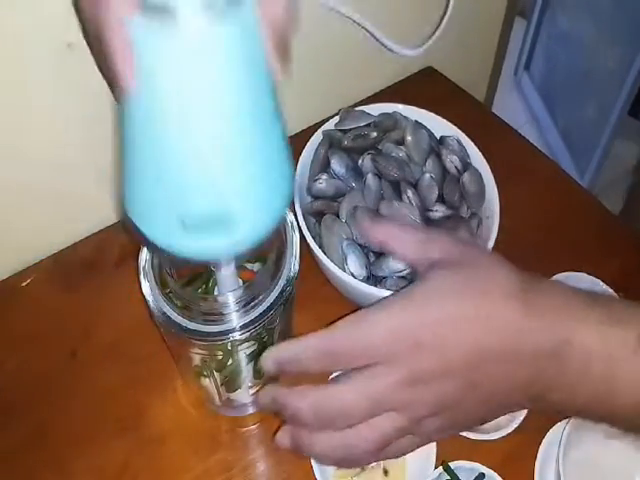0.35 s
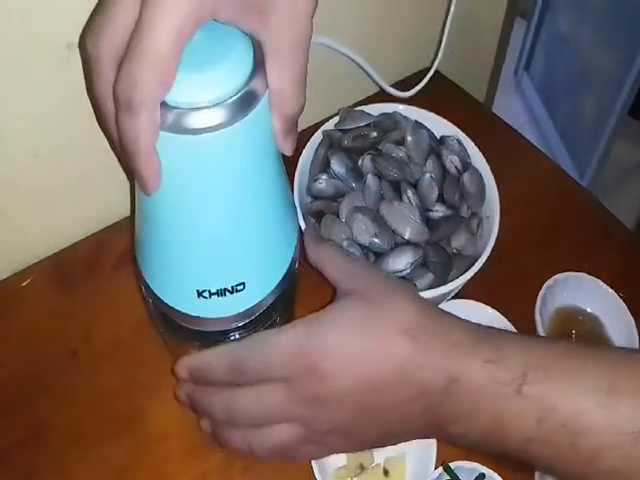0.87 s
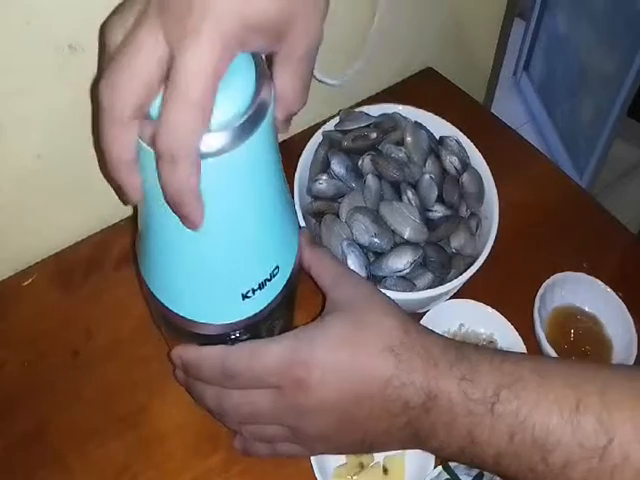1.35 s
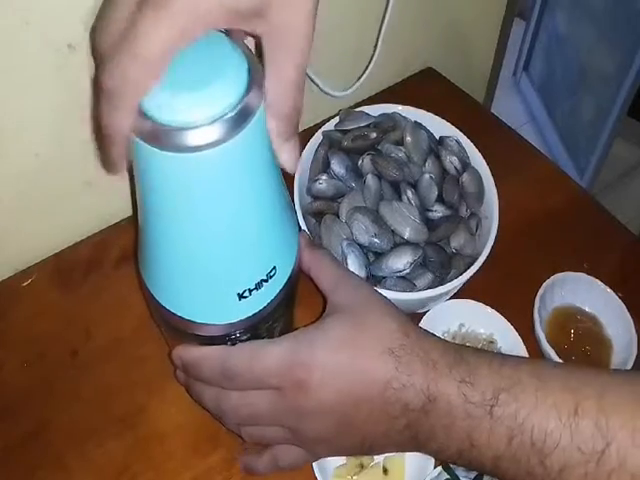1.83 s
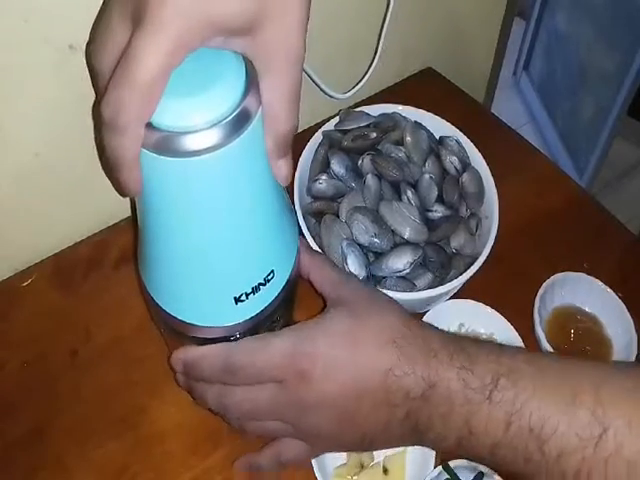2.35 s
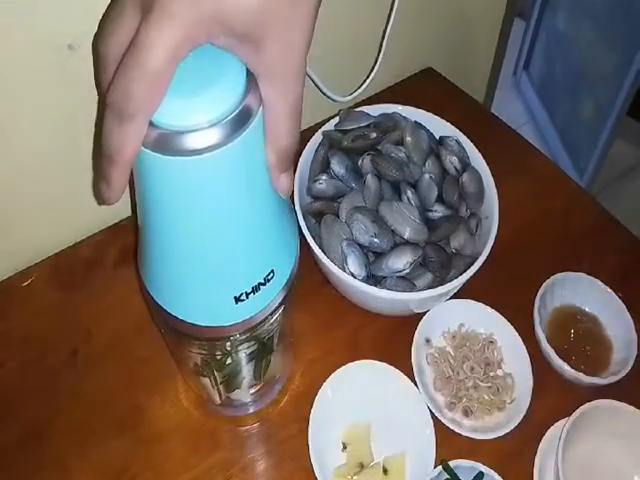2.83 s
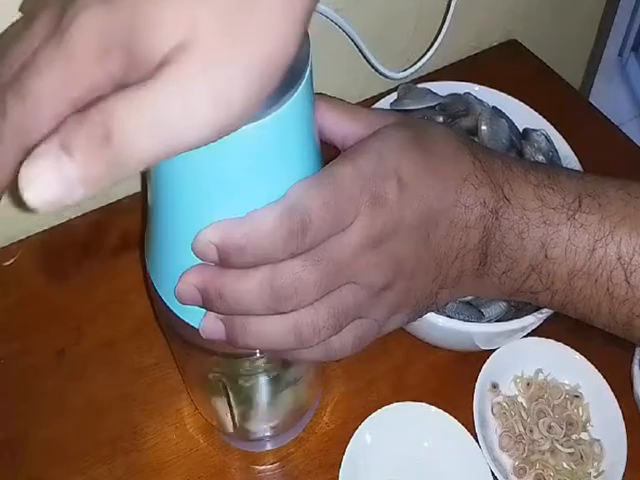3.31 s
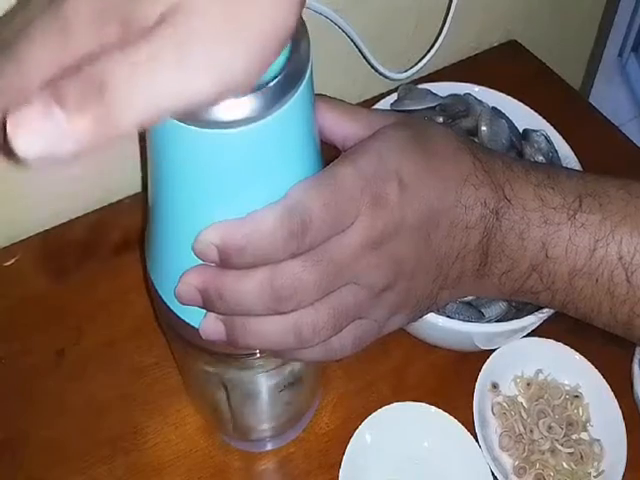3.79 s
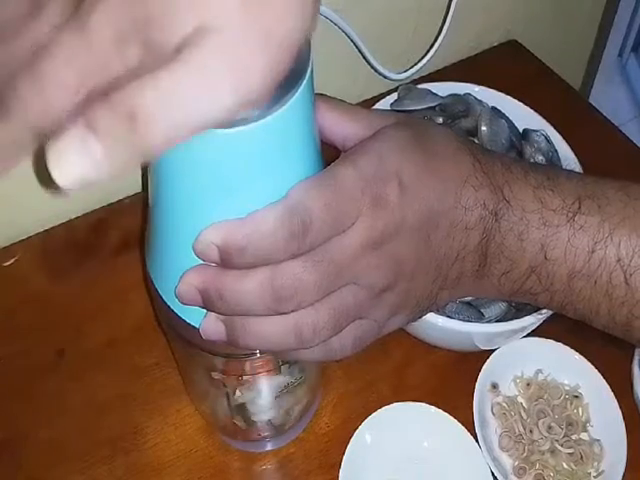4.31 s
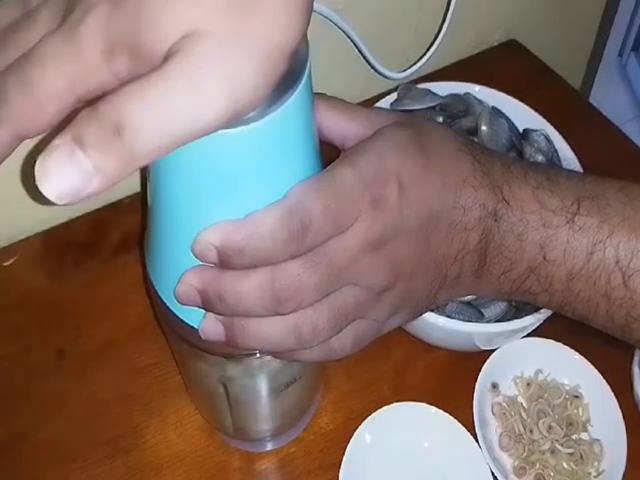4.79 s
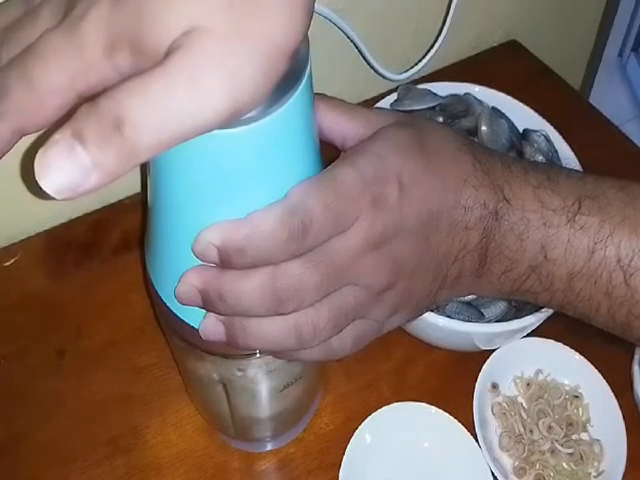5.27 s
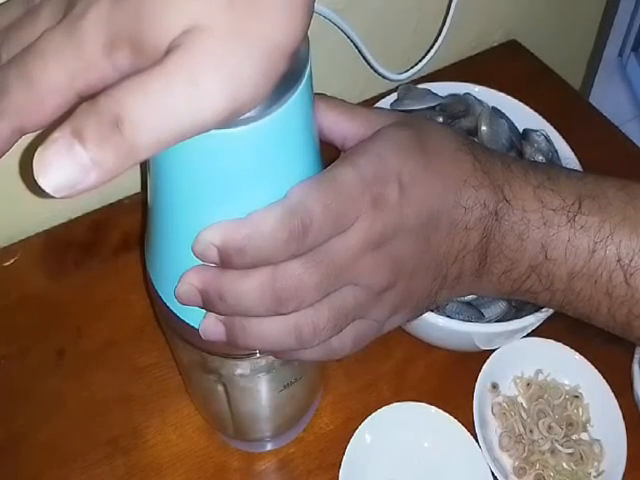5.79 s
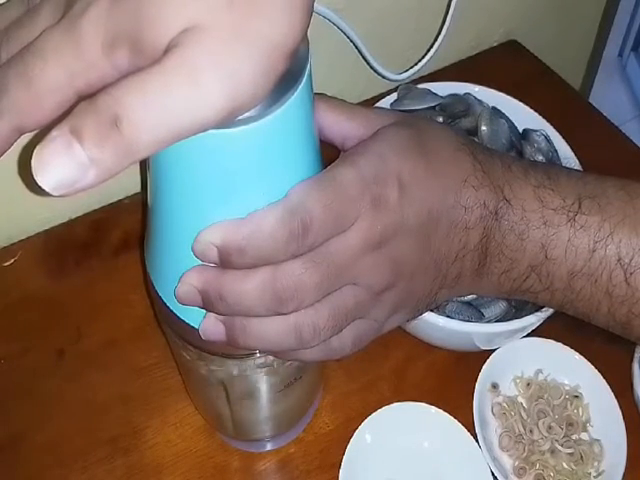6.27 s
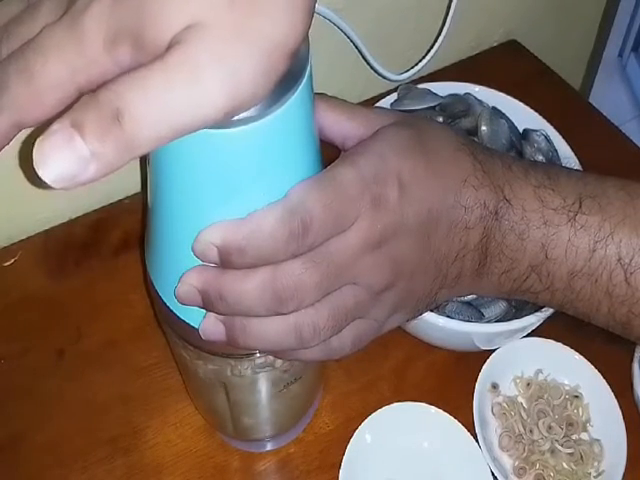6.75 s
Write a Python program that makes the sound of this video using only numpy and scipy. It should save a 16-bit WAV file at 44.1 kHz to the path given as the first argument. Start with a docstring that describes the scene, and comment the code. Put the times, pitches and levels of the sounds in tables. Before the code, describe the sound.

Close up in a small hard-walled kitchen, a plastic motor unit is set on a glass jar on a wooden table with clacks, a short slide and dull bumps. Soft hand rustle follows and the sound cuts out for an instant. A sharp clack starts a half-second burst of geared whirring and chopping; after a short pause, a second clack starts a steady run of about two and a half seconds that quickly winds down.

```python
"""Knocks, clicks and slides: a small geared food chopper is seated on its glass jar on a wooden table.
Noise bursts ring the modes of table, jar and shell. All sound drops out briefly, then the chopper runs twice:
its turning shaft times the gear whine (sines), two blade thumps a turn, and brush and air hiss (coloured noise).
A small hard-walled kitchen echoes it (decaying noise bands) over room tone, faint hum and rustling hands."""
import sys
import numpy as np
from scipy import signal
from scipy.fft import rfft, irfft
from scipy.io import wavfile
from scipy.ndimage import uniform_filter1d

SR = 44100
rng = np.random.default_rng(int(sys.argv[2]) if len(sys.argv) > 2 else 0)


def invert_db(x):
    """Field ratio 10**(x/20) for x, a level in decibels (scalar or array-like)."""
    u = np.asarray(x, float) / 20
    return 10 ** u


def materialize(psi):
    """Save the field psi as 16-bit PCM at rate SR to the path in sys.argv[1].

    A 1-D psi becomes a single channel; in a 2-D psi each row is a channel.
    """
    bounded = np.clip(np.atleast_2d(psi).T, -1, 1)
    quanta = np.round(bounded * 32767).astype(np.int16)
    wavfile.write(sys.argv[1], SR, quanta)


N = 314291


def rms_one(x):
    """Scale to unit rms."""
    return x / np.sqrt(np.mean(x ** 2) + 1e-20)


def in_time(table):
    """Second column of a table, joined by straight lines over time in seconds."""
    s, values = np.transpose(table)
    return np.interp(np.arange(N) / SR, s, values)


def at_hz(points, hz):
    """Read a spectrum on a log frequency axis."""
    points_hz, values = np.transpose(points)
    return np.interp(np.log(np.maximum(hz, 1)), np.log(points_hz), values)


def colour(x, spectrum, size=8192):
    """Minimum-phase filter with the given response, so nothing sounds early; rms 1."""
    response_db = at_hz(spectrum, np.fft.rfftfreq(size, 1 / SR))
    cepstrum = irfft(np.log(invert_db(response_db)))
    cepstrum[1:size // 2] *= 2
    cepstrum[size // 2 + 1:] = 0
    impulse = irfft(np.exp(rfft(cepstrum)))
    return rms_one(signal.fftconvolve(x, impulse)[:N])


def drift(rate_hz):
    """Slow random wander of rms 1: twice-lowpassed noise, computed every 40 samples."""
    r = np.exp(-2 * np.pi * rate_hz * 40 / SR)
    noise = rng.standard_normal(N // 40 + 2002)
    slow = signal.lfilter([1], [1, -2 * r, r * r], noise)[2000:]
    return np.interp(np.arange(N) / 40, np.arange(len(slow)), rms_one(slow))


def ring(drive, hz, t60_s):
    """Two-pole resonator: a unit click sets a decaying sine of height 1 ringing; t60 is at least 2 ms."""
    r = invert_db(-60 / (max(t60_s, .002) * SR))
    w = 2 * np.pi * hz / SR
    return signal.lfilter([0, np.sin(w)], [1, -2 * r * np.cos(w), r * r], drive + 1e-18)


def swells(rows):
    """Sum of bell-shaped bumps in time, each (centre_s, length_s, height)."""
    t = np.arange(N) / SR
    return sum(height * np.exp(-((t - s) / length_s) ** 2) for s, length_s, height in rows)


# room tone spectrum, relative: hz, level_db_per_hz
FLOOR_SPECTRUM = [(12, -50.5), (20, -2.5), (97, -5), (147, -7.5), (164, -19.5), (268, -34.5), (299, 4.5),
                  (327, -10.5), (365, -13), (532, -13.5), (569, -17.5), (1160, -21), (4000, -33.5),
                  (5200, -66), (8800, -120)]


def room_tone():
    """Steady coloured noise whose level wanders slowly."""
    return invert_db(-62.5 + 1.0 * drift(3.6)) * colour(rng.standard_normal(N), FLOOR_SPECTRUM)


def hum():
    """Noise through a narrow resonance gives a wavering tone."""
    return invert_db(-73.5) * rms_one(ring(rng.standard_normal(N), hz=297, t60_s=0.054))


# rustle spectrum, relative: hz, level_db_per_hz
RUSTLE_SPECTRUM = [(470, -42), (800, -23), (1040, -8), (1350, -9), (1680, -11.5), (4160, -13.5),
                   (8340, -13), (15500, -19)]
# hand movements over the steady rustle: centre_s, length_s, level_db
HAND_MOVES = [(0.02, 0.11, -79), (2.15, 0.35, -70), (2.99, 0.031, -61), (3.25, 0.4, -77.5)]


def rustle():
    """Hands on skin and plastic: fluttering coloured noise, swelling with each movement."""
    steady_db = -72
    level = invert_db(steady_db) + swells([(s, length_s, invert_db(db)) for s, length_s, db in HAND_MOVES])
    return level * invert_db(0.59 * drift(20)) * colour(rng.standard_normal(N), RUSTLE_SPECTRUM)


def background():
    """Room tone, hum and rustle add up."""
    return room_tone() + hum() + rustle()


# decay of the room: hz, t60_s
KITCHEN_T60 = [(100, 0.92), (260, 0.44), (700, 0.49), (1840, 0.38), (4850, 0.31), (11000, 0.29)]


def kitchen(x):
    """Diffuse echoes: octave bands of noise, each dying at its own rate."""
    t, tail = np.arange(SR) / SR, 0
    for low_hz in 62.5 * 2. ** np.arange(8):
        band = signal.butter(2, [low_hz, 2 * low_hz], "band", fs=SR, output="sos")
        decay = invert_db(-60 * t / at_hz(KITCHEN_T60, np.sqrt(2) * low_hz))
        tail = tail + signal.sosfilt(band, rng.standard_normal(SR)) * decay
    tail = tail * np.clip(t / 0.0065 - .3, 0, 1)   # echoes set in after 2 ms
    return signal.fftconvolve(x, tail / np.sqrt(np.sum(tail ** 2)))[:N]


# hard clicks: plastic on glass, later the switch and the drive catching:
# start_s, thud_db, clack_db, clack_hz, tick_db
CLICKS = [(0.768, -18.5, -18, 1770, -27), (0.956, -18.5, -38.5, 1150, -39.5), (1.021, -47, -35, 1630, -48),
          (1.05, -53, -34.5, 2050, -46), (1.126, -24, -26, 1960, -30.5), (1.611, -21.5, -25, 2160, -24),
          (1.71, -26.5, -35, 1490, -18), (1.904, -35, -24, 2370, -19.5), (2.131, -34.5, -41, 1400, -46.5),
          (2.315, -37, -47.5, 2490, -41), (2.349, -29.5, -31, 1210, -43), (2.706, -66, -58, 1910, -42),
          (3.495, -22.5, -30, 2500, -36), (3.51, -43, -40, 2500, -41.5), (3.539, -12, -10, 2020, -9.5),
          (4.569, -32.5, -25, 1910, -35.5), (4.576, -17, -17.5, 2030, -7.5)]
# soft bumps of the jar on the table: start_s, thud_db, clack_db
BUMPS = [(0.936, -25, -56.5), (0.985, -45, -48.5), (1.115, -20.5, -47), (1.159, -26, -51),
         (1.598, -26, -45), (1.55, -55, -54), (1.647, -21, -48), (1.696, -25.5, -59), (1.733, -28, -51),
         (2.105, -43, -52), (2.284, -46, -60)]
# the rim slides into its seat: start_s, thud_db, clack_db, clack_hz, chatter_ms
SLIDES = [(0.772, -26.5, -30, 1256, 65), (2.308, -34, -49, 1010, 34)]


def contacts():
    """All touches as (start_s, thud_db, clack_db, clack_hz, tick_db, chatter_ms)."""
    click_ms, bump_ms, bump_hz = 3.8, 6.5, 1440
    bump_tick_db, slide_tick_db = -4.5, -14   # relative to the clack
    clicks = [(*row, click_ms) for row in CLICKS]
    bumps = [(s, thud, clack, bump_hz, clack + bump_tick_db, bump_ms) for s, thud, clack in BUMPS]
    slides = [(s, thud, clack, hz, clack + slide_tick_db, ms) for s, thud, clack, hz, ms in SLIDES]
    return clicks + bumps + slides


def near(hz, centre_hz, octaves):
    """Share of force that a mode takes from a contact centred at another pitch."""
    return np.exp(-(np.log2(hz / centre_hz) / octaves) ** 4)


# modes of table top, jar and plastic shell: pitch_hz, level_db, t60_s (2 ms at least when rung)
BODY_MODES = [(104.5, -2.5, .2), (194, -12.5, 0.12), (330, -6, 0.071), (377, -1.5, 0.058), (509, -6, 0.053),
              (686, -10.5, 0.024), (752, -9, 0.021), (942, -5.5, 0.03), (1232, 0.5, 0.043),
              (1400, -9.5, 0.034), (1570, -0.5, 0.0098), (1738, -9, 0.043), (2020, -5, 0.03),
              (2226, -7, 0.026), (2730, -4, 0.017), (2883, -0.5, 0.018), (3980, -9.5, 0.012),
              (5310, -11.5, 0.011), (8750, -9.5, 0.0013)]


def knocks():
    """Each contact chatters as a dying noise burst; thud, clack and tick drive the modes near them."""
    thud_hz, tick_hz = 315, 6360
    t, out, rows = np.arange(SR // 4) / SR, np.zeros(N), contacts()
    first = 5.3 * (t == 0)   # the first touch is one sharp blow
    bursts = []
    for *_, chatter_ms in rows:
        burst = (rng.standard_normal(len(t)) + first) * np.exp(-t * 1000 / chatter_ms)
        bursts.append(rms_one(burst) / np.sqrt(len(t)))   # unit energy
    for hz, level_db, t60_s in BODY_MODES:
        force = np.zeros(N)
        for (s, thud_db, clack_db, clack_hz, tick_db, chatter_ms), burst in zip(rows, bursts):
            at = round(s * SR)
            strength = invert_db(thud_db) * near(hz, thud_hz, 1.43)
            strength += invert_db(clack_db) * near(hz, clack_hz, 0.43 + chatter_ms / 120)
            strength += invert_db(tick_db) * near(hz, tick_hz, 1.0)
            longer = 1 + chatter_ms / (150 * t60_s)   # a long chatter feeds the mode many times over
            force[at:at + len(t)] += burst * np.sqrt(longer) * invert_db(level_db) * strength
        band = signal.butter(2, [hz / 1.4, 1.4 * hz], "band", fs=SR)
        out += ring(signal.lfilter(*band, force + 1e-18), hz, t60_s)
    ticks = np.zeros(N)   # the bright part also radiates straight from the contact
    for (s, _, _, _, tick_db, chatter_ms), burst in zip(rows, bursts):
        ticks[round(s * SR):][:len(t)] += burst * np.sqrt(chatter_ms) * invert_db(tick_db + 7.0)
    bright = signal.butter(2, [3500, 11000], "band", fs=SR, output="sos")
    return out + signal.sosfilt(bright, ticks)


# brush and air spectrum, relative: hz, level_db_per_hz
HISS_SPECTRUM = [(4000, -22.5), (5500, -5.5), (6300, -8), (7300, -2.5), (8000, 2.5), (8400, 2), (9300, 4),
                 (9900, -2.5), (10400, -0.5), (10700, -7), (11000, -6), (12000, -19.5), (13000, -40),
                 (15500, -50.5)]


def hiss(turns):
    """Brush and air noise, swelling with each blade turn and fluttering."""
    swell = 1 + .3 * np.cos(2 * np.pi * turns) + .12 * np.cos(8 * np.pi * turns)
    flutter = invert_db(1.22 * drift(88) + 0.52 * drift(3.8))
    return colour(swell * flutter * rng.standard_normal(N), HISS_SPECTRUM)


# blades and food spectrum, relative: hz, level_db_per_hz
THUMP_SPECTRUM = [(24, -48.5), (40, -67), (97, -15.5), (151, -27), (184, -8.5), (256, -10.5), (287, -2),
                  (363, 1), (405, -6.5), (440, 2), (485, -6.5), (535, -5), (686, -7.5), (857, -16.5),
                  (1100, -25.5), (1430, -34.5), (2420, -120)]


def thumps(turns):
    """Two blades strike the heap each turn, one harder; loose pieces tumble in their wake."""
    strikes = np.zeros(N)
    for offset_turns, level_db in [(0, 0), (.5, -8)]:
        phase = turns + offset_turns + .015 * drift(12)
        at = np.flatnonzero(np.diff(np.floor(phase)) > 0)
        strikes[at] += invert_db(level_db + 3.5 * rng.standard_normal(len(at)))
    wake = 1 + .45 * np.cos(2 * np.pi * turns - 1) + .4 * np.cos(4 * np.pi * turns - 1)
    loose = wake * invert_db(0.58 * drift(36)) * rng.standard_normal(N)
    return colour(rms_one(strikes) + 1.7 * rms_one(loose), THUMP_SPECTRUM)


# gear noise through the housing, relative: hz, level_db_per_hz
GRIND_SPECTRUM = [(500, -39), (800, -10), (1100, -7.5), (1500, 0), (1900, 4), (2350, 1), (2700, -5),
                  (3050, -11.5), (3650, -3), (4200, -5), (4700, -6.5), (5500, -7), (6500, -55.5)]


def grind(turns, coasting):
    """Tooth friction noise; while the motor coasts the loose teeth also rattle in separate clicks."""
    swell = 1 + .2 * np.cos(2 * np.pi * turns)
    friction = swell * invert_db(1.56 * drift(40)) * rng.standard_normal(N)
    rattle = (rng.random(N) < 250 / SR) * rng.standard_normal(N)   # about 250 clicks per s
    return colour(friction + 0.31 * coasting * rms_one(rattle), GRIND_SPECTRUM)


# tooth tones; three planet wheels favour every third order: cycles_per_blade_turn, level_db
WHINE_ORDERS = [(45, -51.5), (48, -1.5), (49, -3), (51, -1.5), (54, -16.5), (96, -9), (98, -9), (99, -1.5),
                (100, -15), (102, -6.5), (147, -13.5), (150, -6.5)]
# housing response to the whine: hz, level_db
HOUSING_RESPONSE = [(600, -23.5), (1100, -6), (1500, 4.5), (1800, -1.5), (2100, 8.5), (2500, 3), (3000, -4),
                    (3700, 2), (4500, 2.5), (5500, -3.5)]


def whine(speed, turns, unevenness):
    """Tooth tones coloured by the housing; each wavers, and unloaded teeth meet weakly and unevenly."""
    out = 0
    for order, level_db in WHINE_ORDERS:
        housing_db = at_hz(HOUSING_RESPONSE, speed * order)
        gain = invert_db(level_db + housing_db + 0.98 * drift(9.8) - 1.4 * unevenness * order / 50)
        wobble_rad = .006 * order * drift(20) + .25 * unevenness * drift(90)
        out = out + gain * np.sin(2 * np.pi * order * turns + wobble_rad)
    return out


# the hand presses the cap: power_on_s, drive_catches_s, power_off_s, spin_up_s, thump_build_up_s
PRESSES = [(3.492, 3.539, 3.99, .105, .02), (4.556, 4.575, 7.042, .063, .04)]
# full speed that the food allows, before waver: start_s, turns_per_s
FULL_SPEED = [(3.5, 35.0), (3.77, 35.9), (3.87, 35.5), (3.985, 37.4), (4.6, 34.4), (4.72, 35.4),
              (4.86, 35.2), (4.94, 36.1), (5.05, 35.7), (5.2, 36.6), (5.3, 35.3), (5.39, 37.1), (5.5, 36.6),
              (5.65, 36.8), (5.78, 36.4), (6.01, 36.7), (6.08, 37.2), (6.31, 37.1), (6.52, 36.1),
              (6.66, 36.95), (6.86, 37.05), (7.02, 39.3)]
# food in the blades' path, as base level of the thumps: start_s, level_db
FOOD = [(3.5, -18), (3.88, -21), (4.0, -20), (4.6, -21.5), (4.85, -19), (5.08, -22), (5.2, -21),
        (5.28, -23.5), (5.4, -21), (5.7, -22.5), (6.3, -20.5), (7.02, -22.5)]
# brief level changes: start-up growl, hard strikes, jolts as the motor runs down:
# centre_s, thump_change_db, gear_change_db
JOLTS = [(3.528, 6.5, -0.5), (3.552, 1.5, 4), (3.59, -2, 4), (4.059, 5, 8), (3.744, 4.5, 0.5),
         (3.985, 0.5, 5), (4.79, 4.5, -0.5), (4.928, 7, 5), (5.011, 5, 5), (5.17, 3.5, 4), (5.37, 7.5, 1.5),
         (5.78, 3.5, 1.5), (6.9, 3, 0.5), (7.053, 1, 6), (7.08, 9, 4.5)]
# hiss and gears dip briefly: centre_s, length_s, change_db
DIPS = [(5.235, 0.026, -4), (5.71, 0.027, -1.5), (5.915, 0.017, -2.5)]


def chopper():
    """Each press spins the shaft up and lets it coast; speed sets the pitch of everything that turns."""
    brake_turns_per_s2, creep_turns_per_s = 220, 15   # after power off: slows evenly, then creeps
    hiss_base_db, gear_base_db = -23, -19
    torque_db = 9   # gears are louder while they pull the blades up to speed
    idle_db, catch_db, catch_s = -17.5, -14, 0.023   # hiss and gears: before the drive catches; just after
    start_db, power_off_db = -17.5, -3   # thumps at power on; brushes hiss less without current
    coast_s, jolt_s = .07, 0.02
    thump_fade_db_per_s, hiss_fade_db_per_s, gear_fade_db_per_s = 159, 249, 240
    contact_s = 0.012   # the switch makes contact gradually
    strain = .5   # share of the coasting unevenness while speeding up

    t = np.arange(N) / SR
    press = (t > PRESSES[1][0]).astype(int)
    on, catch, off, spin_up_s, build_up_s = np.array(PRESSES)[press].T
    full = in_time(FULL_SPEED) + .12 * drift(6)
    lagging = np.exp(-np.maximum(t - on, 0) / spin_up_s)
    slowed = full * (1 - lagging) - brake_turns_per_s2 * np.maximum(t - off, 0)
    speed = np.maximum(slowed, creep_turns_per_s)
    turns = np.cumsum(speed) / SR
    coasting = uniform_filter1d((t > off) * (slowed > creep_turns_per_s) * 1., size=400)
    spinning = np.clip((slowed - creep_turns_per_s) / 4, 0, 1)

    fading_s = np.maximum(t - off - coast_s, 0)
    after_catch_db = catch_db * np.exp(-np.abs(t - catch) / catch_s)
    drive_db = swells(DIPS) + np.where(t < catch, idle_db, after_catch_db)
    thump_db = in_time(FOOD) + start_db * np.exp(-np.abs(t - on) / build_up_s)
    thump_db += swells([(s, jolt_s, db) for s, db, _ in JOLTS]) - thump_fade_db_per_s * fading_s
    hiss_db = hiss_base_db + power_off_db * (t > off) + drive_db - hiss_fade_db_per_s * fading_s
    gear_db = gear_base_db + torque_db * lagging + drive_db - gear_fade_db_per_s * fading_s
    gear_db += swells([(s, jolt_s, db) for s, _, db in JOLTS])

    unevenness = coasting + strain * np.sqrt(lagging)
    gears = invert_db(-3.5) * grind(turns, coasting) + spinning * invert_db(-4.5) * whine(speed, turns, unevenness)
    switched_on = np.clip((t - on) / contact_s, 0, 1) ** 2
    mix = invert_db(thump_db) * thumps(turns) + invert_db(hiss_db) * hiss(turns) + invert_db(gear_db) * gears
    return switched_on * mix


def scene():
    """Machine and knocks, their echoes and the room; a standing wave cancels a narrow band."""
    machine, hits = chopper(), knocks()
    echoes = kitchen(invert_db(-7) * machine + invert_db(-11.0) * hits)
    heard = machine + hits + echoes + background()
    dip_hz, dip_width_hz = 162, 29
    return signal.lfilter(*signal.iirnotch(dip_hz, dip_hz / dip_width_hz, SR), heard)[None]


def roll_off(x):
    """The treble ends steeply here."""
    return signal.sosfilt(signal.butter(12, 15800, fs=SR, output="sos"), x)


def record(dry):
    """The sound drops out for a moment; peaks are rounded."""
    dropout_start_s, dropout_end_s = 3.431, 3.494
    t = np.arange(N) / SR
    heard = (t < dropout_start_s) | (t > dropout_end_s)
    finished = 1.041 * np.tanh(heard * dry / 1.22)
    return roll_off(finished)


dry = scene()
out = record(dry)
materialize(out)
```